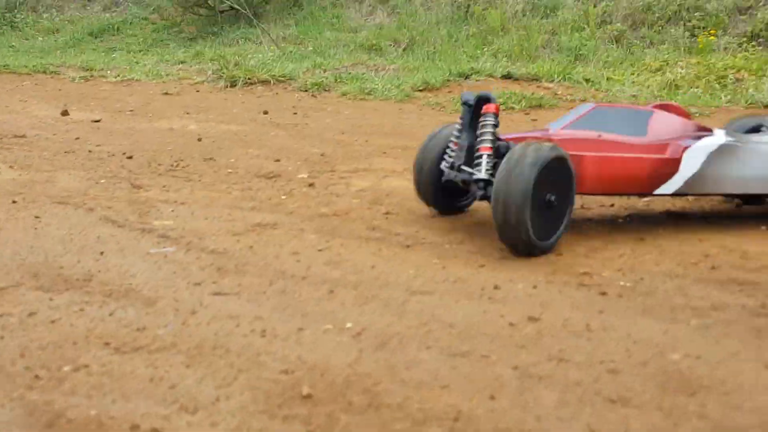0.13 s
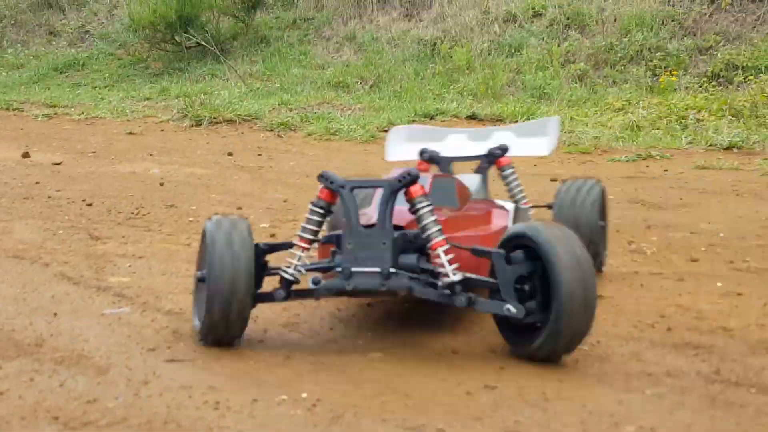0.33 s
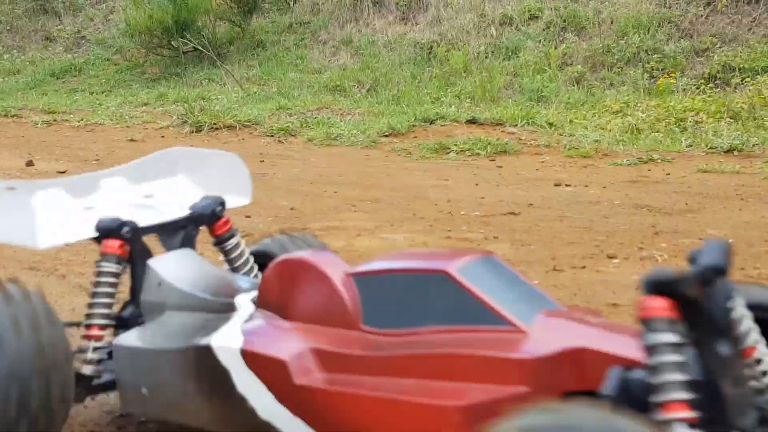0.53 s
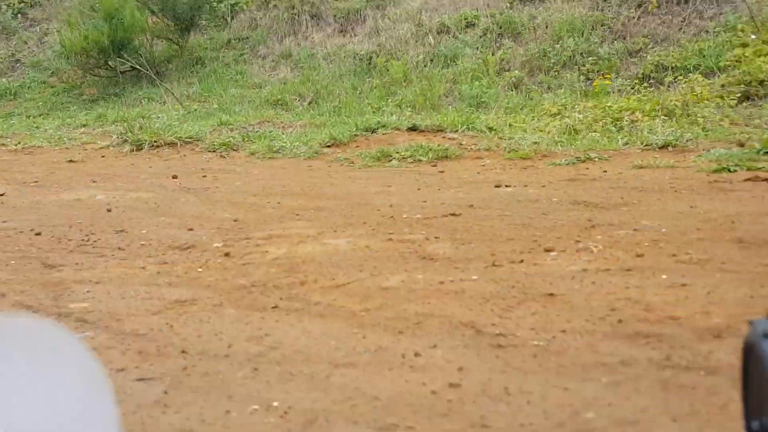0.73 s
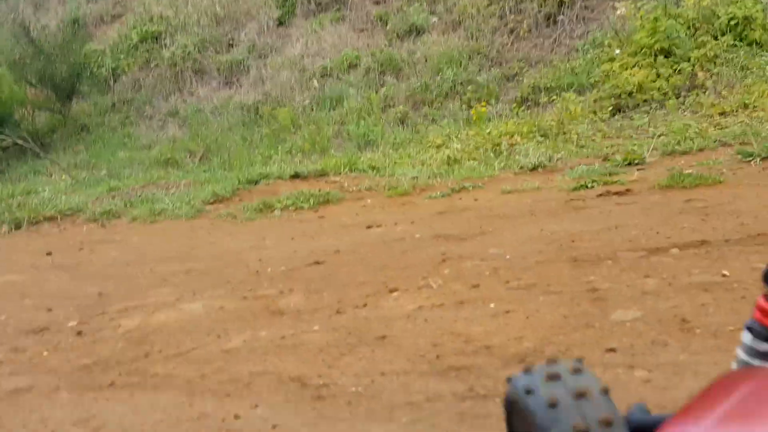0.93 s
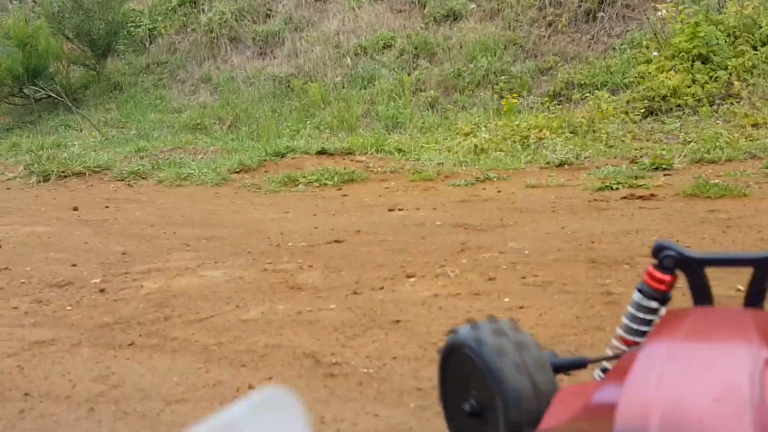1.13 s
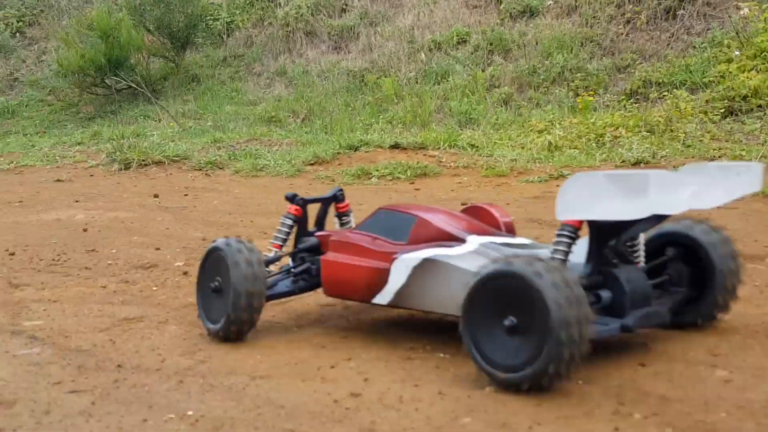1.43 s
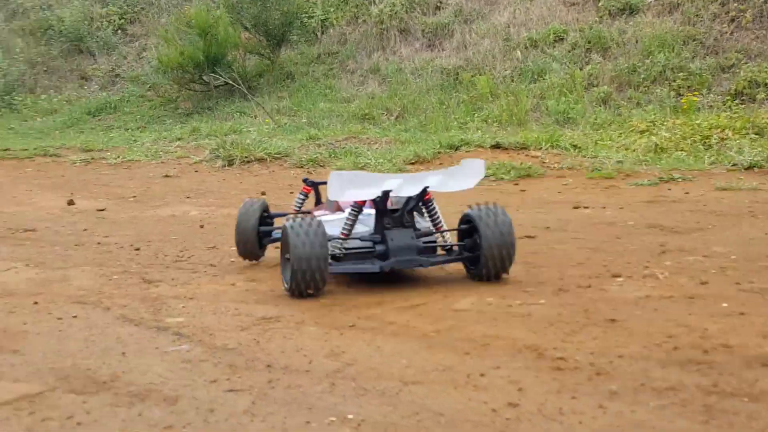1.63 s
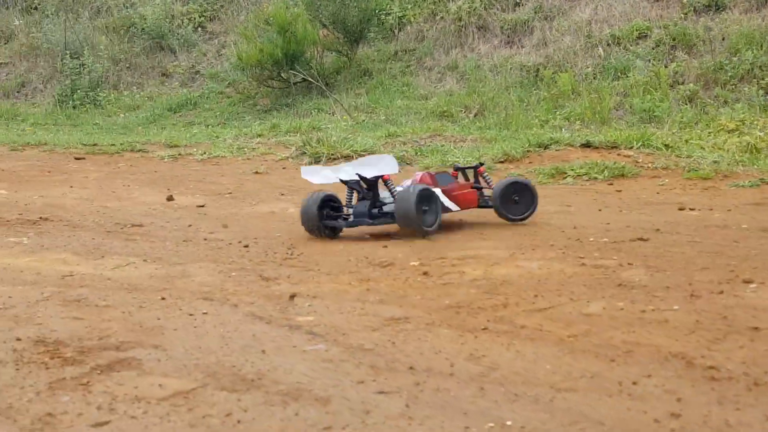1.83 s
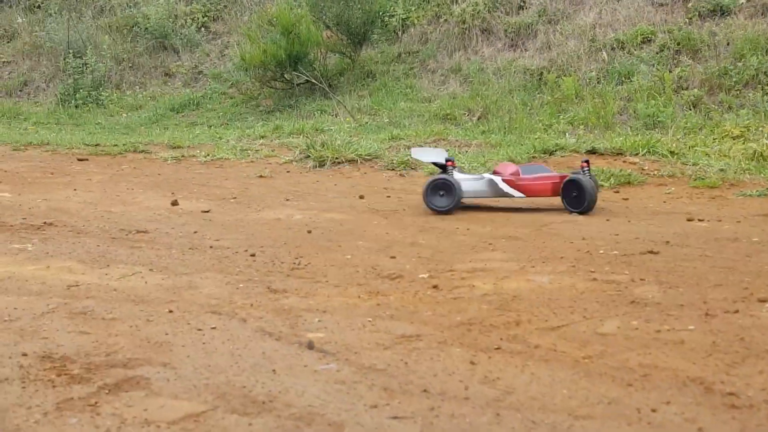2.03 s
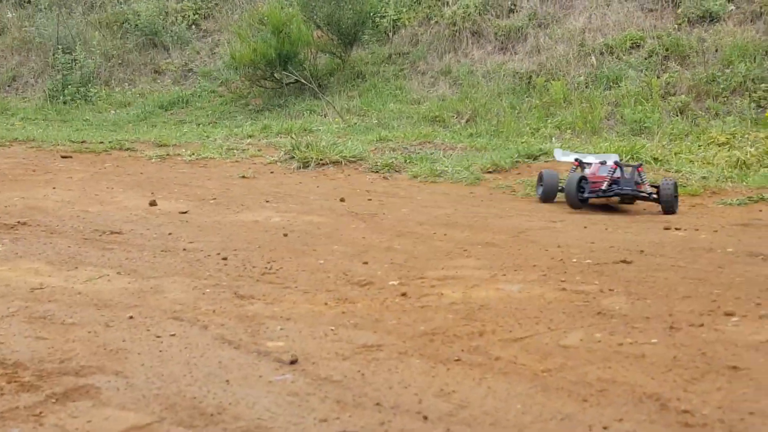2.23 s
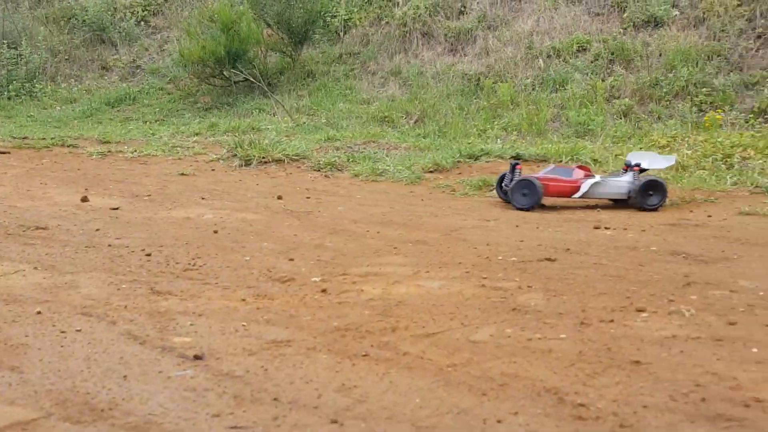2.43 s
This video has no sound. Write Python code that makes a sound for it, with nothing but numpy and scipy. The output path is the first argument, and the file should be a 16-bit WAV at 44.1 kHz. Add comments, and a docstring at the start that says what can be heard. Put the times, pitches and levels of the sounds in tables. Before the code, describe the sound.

Outdoors, a remote-controlled buggy approaches, gears whining and rasping with the throttle as its chassis clatters and grit flies. It goes briefly quiet beside the microphone, then accelerates off over the dirt, with light wind underneath.

```python
"""A small electric buggy drives up close on loose dirt, coasts almost to a stop, then pulls away.
Its meshing gears whine and rasp roughly with the throttle, throbbing with each turn of the wheels.
The plastic chassis rattles and rings over bumps; the tyres crunch, thud, scrape and throw grit.
Behind it, light wind rumbles on the microphones and an engine hums far away."""
import sys
import numpy as np
from scipy import signal
from scipy.fft import rfft, irfft, next_fast_len
from scipy.io import wavfile
from scipy.ndimage import map_coordinates

SR = 44100
rng = np.random.default_rng(int(sys.argv[2]) if len(sys.argv) > 2 else 0)


def pcm_store(signal):
    """Save signal as 16-bit PCM."""
    levels = np.round(np.clip(np.atleast_2d(signal), -1, 1) * 32767)
    wavfile.write(sys.argv[1], SR, levels.astype(np.int16).T)


N = 114660

# how hard the tyres work the dirt (time [s], level [dB])
TYRE_ENVELOPE = [(0, -40.5), (.06, -51.5), (.18, -41.5), (.5, -39.5), (.68, -34.5), (.76, -39),
                 (.81, -47.5), (.86, -39.5), (.95, -65), (1.035, -64), (1.045, -63.5), (1.125, -32.5),
                 (1.24, -43), (1.42, -46.5), (1.5, -55), (1.66, -49.5), (1.79, -44.5), (1.96, -46.5),
                 (2.07, -54), (2.14, -49), (2.28, -44.5), (2.55, -51.5)]


def amp(db):
    """Decibels to linear gain."""
    return 10 ** (np.asarray(db) / 20)


def unit(x):
    """Normalise to rms 1."""
    return x / np.sqrt(np.mean(x ** 2) + 1e-20)


def along(points, hz):
    """Read (frequency, value) points on a log frequency axis."""
    freqs, values = np.transpose(points)
    return np.interp(np.log(hz + 1), np.log(freqs + 1), values)


def curve(rows):
    """An envelope, one value per sample, from (time, value) rows."""
    return np.interp(np.arange(N) / SR, *np.transpose(rows))


def wobble(rate):
    """A smooth random curve, rate knots a second."""
    return map_coordinates(rng.standard_normal(N), [np.arange(N) * rate / SR + 4])


def swell(s, width_s):
    """A smooth bump of height 1 around a time."""
    return np.exp(-.5 * ((np.arange(N) / SR - s) / width_s) ** 2)


def filtered(x, response):
    """Filter x by a gain given as a function of frequency."""
    size = next_fast_len(N + SR // 4)
    return irfft(rfft(x, size) * response(np.fft.rfftfreq(size, 1 / SR)), size)[..., :N]


def coloured(x, spectrum):
    """Shape x with an EQ curve, at rms 1."""
    return unit(filtered(x, lambda hz: amp(along(spectrum, hz))))


def spread(pair):
    """Two unrelated signals become left and right, alike in the bass."""
    # match between the channels (frequency [Hz], likeness [clipped to 0..1])
    likeness = [(250, 10), (550, 1.5), (1100, 0.8), (2200, 0.03), (4400, 0.56), (12000, -1)]
    angle = lambda hz: np.arccos(np.clip(along(likeness, hz), 0, 1)) / 2
    mid, side = filtered(pair, lambda hz: np.array([np.cos(angle(hz)), np.sin(angle(hz))]))
    return np.array([mid + side, mid - side])


def add(track, s, sound):
    """Mix a sound in at a time."""
    part = track[..., round(s * SR):][..., :sound.shape[-1]]
    part += sound[..., :part.shape[-1]]


def impacts(per_s, scatter_db, life_s):
    """Random tiny noise bursts of uneven size, as a pair of rms 1."""
    hits = rng.random(N) < per_s / SR
    sizes = hits * amp(scatter_db * np.clip(rng.standard_normal(N), -2, 2))
    power = signal.lfilter([1], [1, -np.exp(-2 / (life_s * SR))], sizes ** 2)
    return unit(np.sqrt(power) * rng.standard_normal((2, N)))


def clicks(rows, ring_s, crack_s, crack_gain, low_cut_hz):
    """Hard contacts: a crack and one short ring each, with the bass cut."""
    out, t = np.zeros((2, N)), np.arange(SR // 50) / SR
    for s, db, hz in rows:
        ring = np.sin(2 * np.pi * hz * t + rng.normal(0, 1.0, (2, 1))) * np.exp(-t / ring_s)
        crack = crack_gain * rng.standard_normal((2, len(t))) * np.exp(-t / crack_s)
        add(out, s, amp(db) * (ring + crack))
    return signal.lfilter(*signal.butter(2, low_cut_hz, "high", fs=SR), out)


def still_air(level_db=-77):
    """A faint, steady bed of outdoor air."""
    # colour of the air (frequency [Hz], level [dB])
    spectrum = [(100, -24), (700, 1), (2000, -10), (16000, -36)]
    return amp(level_db) * coloured(spread(rng.standard_normal((2, N))), spectrum)


def far_engine(pitch_hz=178.6, sub_octave_db=-2):
    """A distant engine hums on one note and the octave below."""
    # rise and fade of the hum (time [s], level [dB])
    envelope = [(0, -50.5), (.95, -43), (2.18, -47.5), (2.6, -69)]
    phase = 2 * np.pi * pitch_hz * np.arange(N) / SR
    return amp(curve(envelope)) * np.sqrt(2) * (np.sin(phase) + amp(sub_octave_db) * np.sin(phase / 2))


def wind(buffet_db=1.5):
    """Light gusts buffet the microphones with a low rumble."""
    # gust strength (time [s], level [dB])
    gusts = [(0, -42), (.12, -35), (.8, -39), (.862, -33), (1.05, -35.5), (1.35, -45), (1.48, -38.5),
             (1.82, -38), (2.2, -43), (2.6, -47)]
    # colour of the rumble (frequency [Hz], level [dB])
    spectrum = [(25, -29), (50, -2), (75, -5.5), (115, -10), (200, -21), (2000, -55)]
    rumble = coloured(rng.standard_normal((2, N)), spectrum)
    return amp(curve(gusts) + buffet_db * wobble(15.4)) * rumble


def controller(nearest_s=1.01, width_s=.045):
    """The speed controller sings faintly as the buggy coasts closest."""
    # thin electronic tones (pitch [Hz], level [dB])
    tones = [(5771, -56), (7817, -65), (11531, -63)]
    t = np.arange(N) / SR
    return swell(nearest_s, width_s) * sum(amp(db) * np.sin(2 * np.pi * hz * t) for hz, db in tones)


def pebbles(count=80, trim_db=6, scatter_db=5, centre_hz=7500):
    """Stones flung at random chink together, louder when the tyres work harder."""
    # one placed chink (time [s], level [dB], pitch [Hz])
    accent = [(1.253, -22.5, 7700)]
    when, size, octave = rng.random((count, 3)).T
    s = when * (N - 1) / SR
    db = np.interp(s, *np.transpose(TYRE_ENVELOPE)) + trim_db + scatter_db * (2 * size - 1)
    hz = centre_hz * 2 ** (2 * octave - 1)
    return clicks([*accent, *zip(s, db, hz)], ring_s=.0037, crack_s=.0011, crack_gain=.3, low_cut_hz=4000)


def grit():
    """Thrown grit ticks brightly against the shell."""
    # hits on the shell (time [s], level [dB], pitch [Hz])
    ticks = [(.025, -25, 12000), (.077, -22.5, 11100), (.19, -21.5, 8940), (.5075, -12.5, 8660),
             (.539, -22, 13800), (.724, -9.5, 9200), (.7285, -17, 9600), (.8555, -20, 11000),
             (1.0045, -32.5, 3320), (1.045, -25.5, 7830), (1.2015, -23, 8900), (1.312, -22, 9000),
             (1.413, -23, 10500)]
    return clicks(ticks, ring_s=.001, crack_s=.0021, crack_gain=1.0, low_cut_hz=5650)


def scrapes(centre_hz=4140, width_hz=400, width_s=.007):
    """Slipping tread gives brief, narrow swishes as the buggy speeds away."""
    # tread slips (time [s], level [dB])
    slips = [(1.595, -41), (1.637, -42), (1.75, -41), (1.778, -43), (1.818, -40.5), (2.585, -46.5)]
    passband = lambda hz: np.exp(-.5 * ((hz - centre_hz) / width_hz) ** 2)
    swish = unit(filtered(rng.standard_normal((2, N)), passband))
    return swish * sum(amp(db) * swell(s, width_s) for s, db in slips)


def thuds(rise_s=.008):
    """Wheels thump the ground close by, a few soft, low cycles each."""
    # wheel thumps (time [s], level [dB], pitch [Hz])
    thumps = [(.818, -23, 180), (.853, -17.5, 73), (.917, -29, 88), (.982, -24.5, 70)]
    out, t = np.zeros(N), np.arange(SR // 2) / SR
    envelope = t / rise_s * np.exp(1 - t / rise_s)
    for s, db, hz in thumps:
        add(out, s, amp(db) * envelope * np.sin(2 * np.pi * hz * t))
    return out


def tyres(trim_db=6.5, clump_db=1.62):
    """Grains of dirt crunch in clumps over a hiss of fine dust."""
    # colour of the crunch (frequency [Hz], level [dB])
    spectrum = [(500, -4), (1300, 7.5), (2300, 1.5), (5300, -7), (8000, -4.5), (10500, -6), (15500, -12.5)]
    grains = impacts(per_s=1300, scatter_db=3.5, life_s=.00056)
    dust = rng.standard_normal((2, N))
    crunch = coloured(spread(grains + dust), spectrum)
    return amp(curve(TYRE_ENVELOPE) + trim_db + clump_db * wobble(60)) * crunch


def stone_clacks():
    """Stones clack hard against the buggy."""
    # stone clacks (time [s], level [dB], pitch [Hz])
    clacks = [(.3, -21, 3500), (.8222, -9, 2700), (.8257, -7, 2950), (1.8255, -14.5, 1650)]
    return clicks(clacks, ring_s=.0008, crack_s=.0009, crack_gain=.3, low_cut_hz=900)


def knocks():
    """Each bump rings the damped modes of the chassis."""
    # chassis modes (frequency [Hz], bandwidth [Hz], level [dB])
    modes = [(500, 130, -3), (700, 190, 0), (950, 220, -2), (1250, 260, -7), (1950, 350, -14)]
    # bumps in the ground (time [s], level [dB])
    bumps = [(.189, -7), (.1945, -14), (.5065, -10), (.647, -16), (.7235, -11), (.728, -5), (.736, -9),
             (.845, -12), (.99, -29), (1.038, -21)]
    out, t = np.zeros(N), np.arange(SR // 16) / SR
    ring = sum((-1) ** k * amp(db) * np.exp(-np.pi * width * t) * np.sin(2 * np.pi * hz * t)
               for k, (hz, width, db) in enumerate(modes))
    for s, db in bumps:
        add(out, s, amp(db) * ring / np.abs(ring).max())
    return out


def rattle(trim_db=-2.5):
    """Tread blocks and loose joints keep the plastic body shaking."""
    # strength of the shaking (time [s], level [dB])
    envelope = [(0, -28.5), (.05, -35.5), (.17, -25), (.3, -27), (.39, -34), (.49, -25.5), (.64, -22.5),
                (.74, -18.5), (.81, -27.5), (.845, -18.5), (.88, -21), (.91, -29.5), (.935, -29.5),
                (.955, -48), (1.03, -46), (1.042, -31), (1.125, -19), (1.25, -29), (1.41, -30),
                (1.5, -34.5), (1.68, -38.5), (1.77, -31), (1.89, -39.5), (1.98, -32), (2.08, -38),
                (2.16, -35.5), (2.5, -38), (2.6, -35.5)]
    # colour of the plastic body (frequency [Hz], level [dB])
    spectrum = [(100, -34), (220, -9.5), (350, -7), (480, 4), (700, 1.5), (950, 2), (1400, -15),
                (2000, -12), (2800, -31), (6000, -44)]
    chatter = impacts(per_s=1300, scatter_db=3, life_s=.0039)
    return amp(curve(envelope) + trim_db) * coloured(spread(chatter), spectrum)


def mesh_tone(pitch, cycles, blur=.05):
    """Meshing teeth sound three harmonics, each blurred by fast pitch jitter."""
    # harmonics 1 to 3 (level [dB])
    harmonics = [17.5, 1.5, -5]
    tone = np.zeros(N)
    for k, db in enumerate(harmonics, 1):
        drift = np.cumsum(blur * pitch * np.sqrt(k) * wobble(600)) / SR
        tone += amp(db) * np.sin(2 * np.pi * (k * cycles + drift))
    return tone


def gear_rasp(throb, throb_db=4):
    """Loaded teeth rasp: throbbing noise through the gearbox resonances."""
    # strength of the rasp (time [s], level [dB])
    envelope = [(0, -65), (.18, -30.5), (.33, -37), (.45, -30), (.63, -29), (.75, -39.5), (.94, -81),
                (1.035, -68), (1.045, -34), (1.2, -35.5), (1.5, -40.5), (1.7, -42.5), (1.77, -38),
                (2.06, -52.5), (2.13, -41), (2.28, -61), (2.6, -40.5)]
    # gearbox resonances (frequency [Hz], level [dB])
    resonances = [(900, -6), (1550, -4.5), (1950, 10), (2350, -4.5), (3200, -24), (3850, -3), (4500, -6.5),
                  (5300, -15.5), (12000, -62)]
    friction = amp(throb_db * throb) * rng.standard_normal((2, N))
    return amp(curve(envelope)) * coloured(spread(friction), resonances)


def gear_whine(pitch, cycles, throb, trim_db=4.5, throb_db=7.5, rough_db=2.2, surge_db=1.8, width=.52):
    """The rough mesh tone surges with the load, leaps when teeth catch and sings through the housing."""
    # strength of the whine (time [s], level [dB])
    envelope = [(0, -59), (.1, -43), (.21, -38), (.3, -45), (.43, -34), (.62, -32.5), (.72, -46),
                (.85, -45), (.94, -59), (1.034, -59), (1.042, -35), (1.098, -32), (1.19, -38.5),
                (1.35, -40.5), (1.535, -38), (1.58, -46), (1.72, -46), (2.6, -51.5)]
    # teeth catching under load (time [s], boost [dB])
    catches = [(.598, 3), (1.096, 8), (1.543, 8)]
    # response of the housing (frequency [Hz], gain [dB])
    housing = [(1000, 2.5), (2050, -1), (3300, -0.5), (3850, 2.5), (4500, -39), (5300, 5), (7000, -3)]
    load_db = surge_db * wobble(22) + sum(db * swell(s, width_s=.003) for s, db in catches)
    direct, scattered = mesh_tone(pitch, cycles), width * mesh_tone(pitch, cycles)
    gain = amp(throb_db * throb + rough_db * wobble(300) + load_db)
    tone = unit(gain * np.array([direct + scattered, direct - scattered]))
    return amp(curve(envelope) + trim_db) * filtered(tone, lambda hz: amp(along(housing, hz)))


def gears(flutter=.021, teeth_per_turn=57, tight_spot_s=.598, full_speed_hz=2050):
    """Whine and rasp throb as a tight spot comes round with each wheel turn, harder at speed."""
    # rate at which the teeth mesh (time [s], pitch [Hz])
    mesh_pitch = [(0, 800), (.08, 1050), (.17, 1850), (.23, 1950), (.31, 1350), (.42, 1980), (.51, 2000),
                  (.55, 2090), (.64, 2070), (.76, 1350), (.96, 750), (1.1, 1180), (1.125, 1850),
                  (1.15, 1750), (1.19, 1200), (1.555, 1170), (1.7, 1730), (1.98, 1980), (2.2, 1850),
                  (2.43, 2100), (2.6, 1980)]
    pitch = curve(mesh_pitch)
    cycles = np.cumsum(pitch * (1 + flutter * wobble(90))) / SR
    wheel_turns = (cycles - cycles[round(tight_spot_s * SR)]) / teeth_per_turn
    throb = np.cos(2 * np.pi * wheel_turns) * (pitch / full_speed_hz) ** 2
    return gear_whine(pitch, cycles, throb) + gear_rasp(throb)


def scene():
    """The buggy over its outdoor bed."""
    rolling = gears() + controller() + rattle() + tyres() + scrapes()
    hits = knocks() + thuds() + grit() + stone_clacks() + pebbles()
    return rolling + hits + wind() + far_engine() + still_air()


def record(dry, left_lag_s=.00009, top_hz=16000):
    """Each microphone has its own colour, the left hears a little later; the extreme top is cut."""
    # left microphone EQ (frequency [Hz], gain [dB])
    left_eq = [(100, 1.5), (4500, 4.5), (5600, 0.5), (7000, -14.5), (8700, -15), (11000, -5.5), (15000, -4)]
    # right microphone EQ (frequency [Hz], gain [dB])
    right_eq = [(1000, 1), (4500, 4.5), (7500, 3), (9000, -2), (11500, 0), (15000, -4.5)]
    left = lambda hz: amp(along(left_eq, hz)) * np.exp(-2j * np.pi * hz * left_lag_s)
    right = lambda hz: amp(along(right_eq, hz))
    return filtered(dry, lambda hz: (hz < top_hz) * np.array([left(hz), right(hz)]))


dry = scene()
out = record(dry)
pcm_store(out)
```